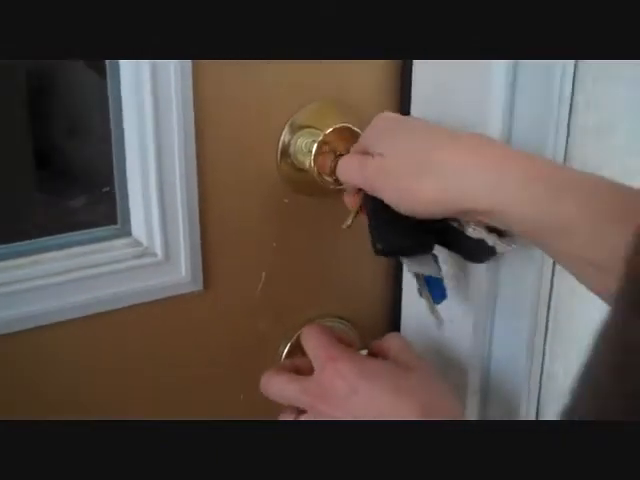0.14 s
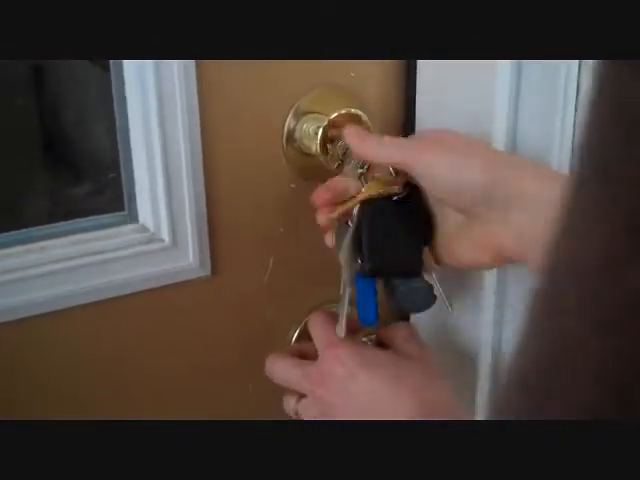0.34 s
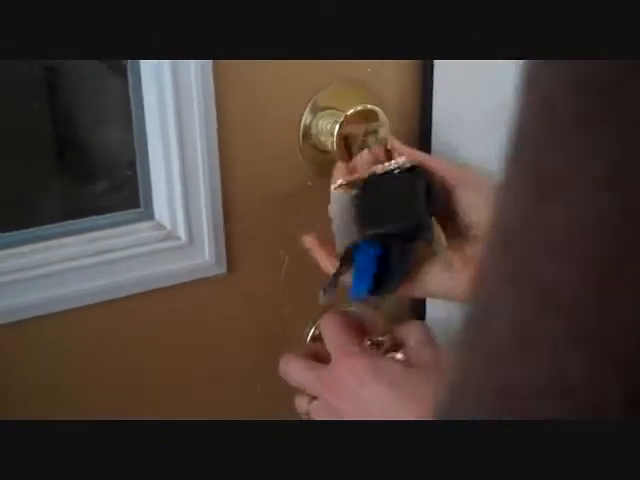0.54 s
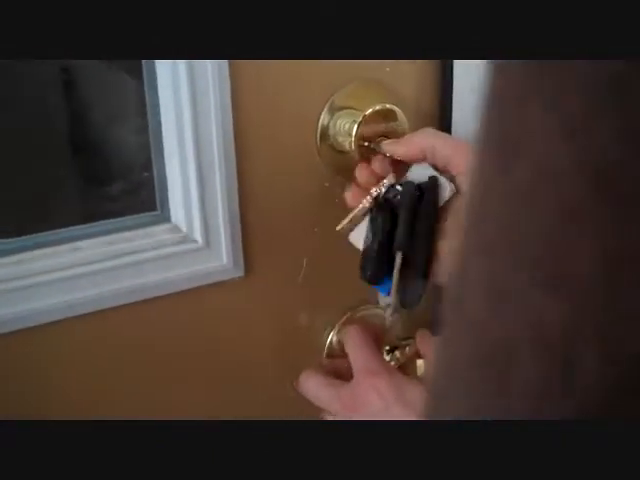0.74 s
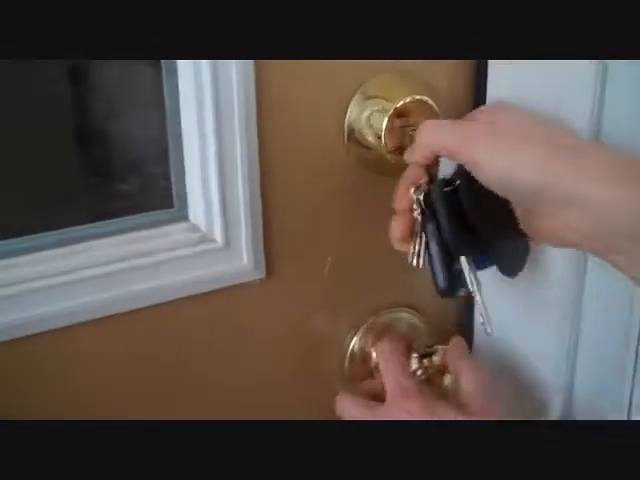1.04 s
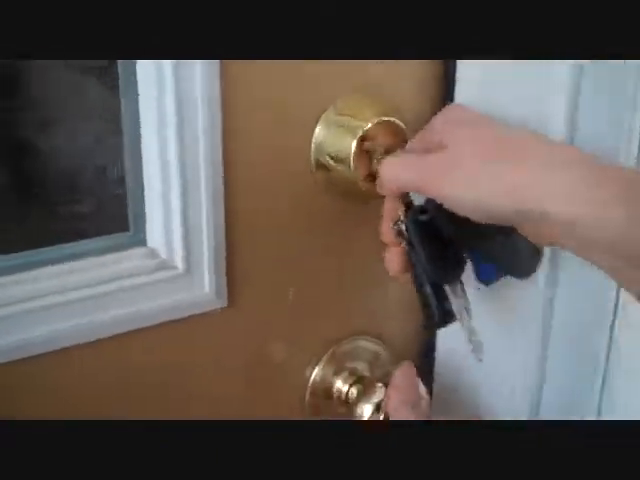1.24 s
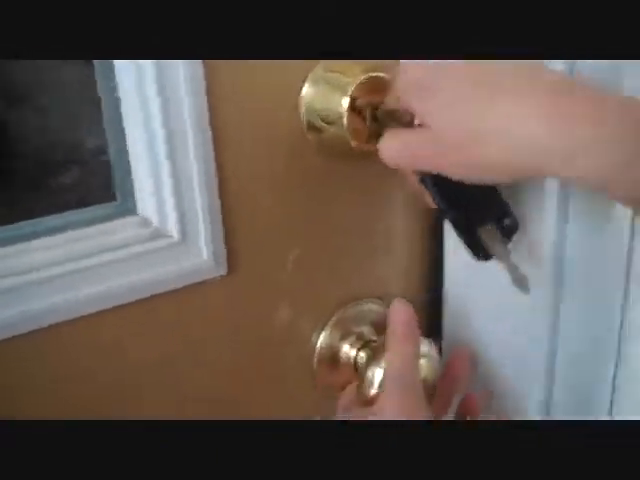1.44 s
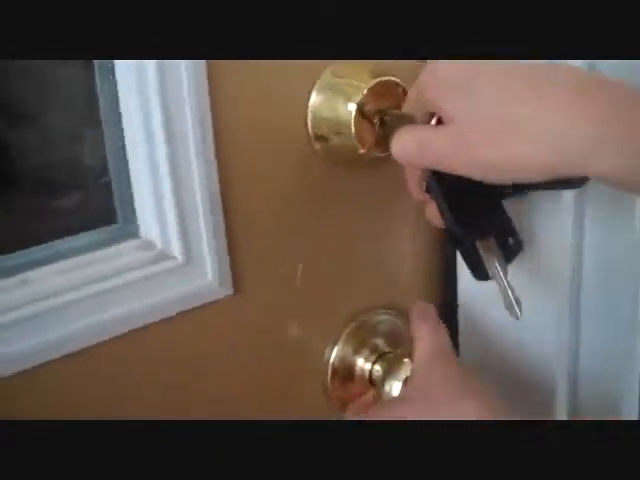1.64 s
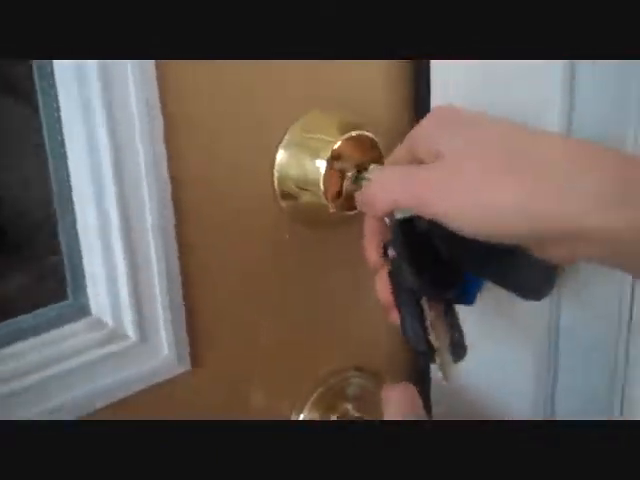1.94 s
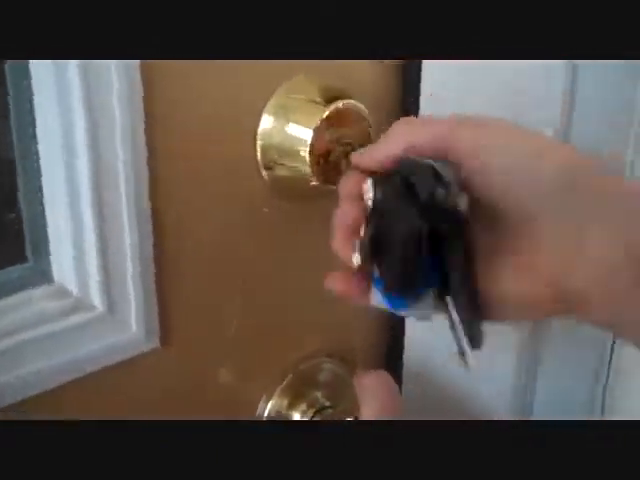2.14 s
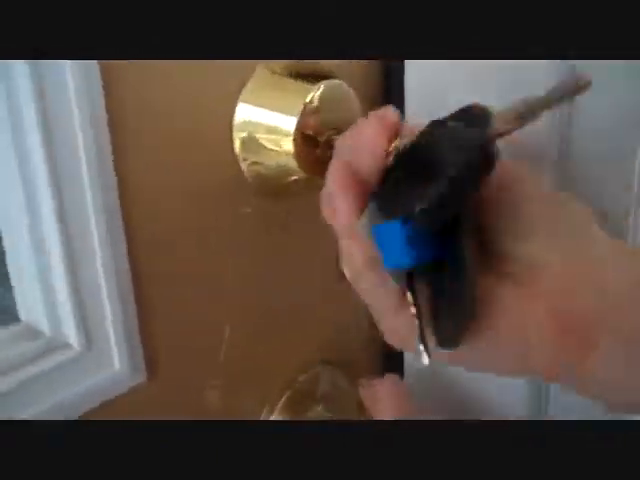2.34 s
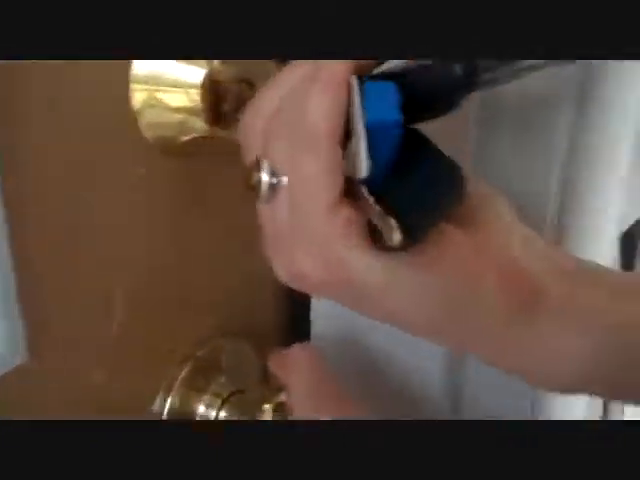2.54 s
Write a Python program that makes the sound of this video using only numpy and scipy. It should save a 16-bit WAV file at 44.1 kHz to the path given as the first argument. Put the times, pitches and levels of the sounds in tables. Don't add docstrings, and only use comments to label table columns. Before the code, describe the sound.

Keys jingle and clack on a ring as a deadbolt turns and snaps in a wooden door

```python
import sys
import numpy as np
from scipy import signal
from scipy.io import wavfile

SR = 44100
rng = np.random.default_rng(int(sys.argv[2]) if len(sys.argv) > 2 else 0)


def bounce(signal):
    frames = np.transpose(np.atleast_2d(signal))
    limited = np.clip(frames, -1, 1)
    pcm = np.round(limited * 32767).astype(np.int16)
    wavfile.write(sys.argv[1], SR, pcm)


def voltage_ratio(level):
    return 10 ** (np.asarray(level, float) / 20)


N = 119070


def in_time(rows):
    seconds, values = np.transpose(rows)
    return np.interp(np.arange(N) / SR, seconds, values)


def at_hz(points, hz):
    table = np.array(points)
    return np.interp(np.log(hz), np.log(table[:, 0]), table[:, 1])


def rms_one(x):
    return x / np.sqrt(np.mean(x ** 2) + 1e-20)


def drift(rate):
    hop = 40
    r = np.exp(-2 * hop * np.pi * rate / SR)
    noise = rng.standard_normal(N // hop + 2002)
    slow = signal.lfilter([1], [1, -2 * r, r * r], noise)[2000:]
    return np.interp(np.arange(N) / hop, np.arange(len(slow)), rms_one(slow))


def peak(x, hz, width_hz):
    r = np.exp(-np.pi * width_hz / SR)
    feedback = [1, -2 * r * np.cos(2 * np.pi * hz / SR), r * r]
    return signal.lfilter([(1 - r * r) / 2, 0, (r * r - 1) / 2], feedback, x + 1e-18)


def ring(x, hz, t60):
    r, w = voltage_ratio(-60 / (t60 * SR)), 2 * np.pi * hz / SR
    return signal.lfilter([0, np.sin(w)], [1, -2 * r * np.cos(w), r * r], x + 1e-18)


def grains(shape, rate, spread_db):
    size = voltage_ratio(spread_db * np.minimum(rng.exponential(1, shape), 4)) * rng.choice([-1, 1], shape)
    return size * (rng.random(shape) < rate / SR)


def banded(white, spectrum, patchy_db, rate):
    # (pitch_hz, likeness 0-1)
    likeness = [(30, 0.1), (100, 0.86), (400, 1), (1200, 0.79), (3000, 0.424), (8000, 0.055)]
    out, together = 0, drift(rate)
    edges = 20 * 2 ** np.arange(0, 9.6, .5)
    for k, (low, high) in enumerate(zip(edges, edges[1:])):
        hz = np.sqrt(low * high)
        if hz < spectrum[0][0] * .8:
            continue
        band = signal.butter(2, [low, high], "band", fs=SR, output="sos")
        mid, side = signal.sosfilt(band, white[k % 2])
        alike = np.clip(at_hz(likeness, hz), 0, 1)
        gain = voltage_ratio(at_hz(spectrum, hz) + patchy_db * (together + .5 * drift(5.9)))
        out = out + gain * (np.sqrt(1 + alike) * mid + np.sqrt(1 - alike) * side * [[1], [-1]])
    return rms_one(out)


def ports(x):
    peak_hz, width_hz, peak_db = (7284, 5990), (754, 920), (10, 8)
    top_hz, trim_db, lag_samples = (14500, 6230), (0.98, 2.35), (2, 0)
    out = []
    for k in range(2):
        lifted = x[k] + voltage_ratio(peak_db[k]) * peak(x[k], peak_hz[k], width_hz[k])
        top = signal.butter(2 + k, min(top_hz[k], .45 * SR), fs=SR, output="sos")
        soft = signal.sosfilt(top, lifted)
        out.append(voltage_ratio(trim_db[k]) * np.roll(soft, lag_samples[k]))
    return np.array(out)


def traffic():
    # (pitch_hz, level_db per Hz)
    street_colour = [(25, -15), (75, -2), (140, -4), (280, -13), (750, -1), (1300, -7), (2200, -14.5),
                     (8000, -30.5)]
    # (time_s, level_db)
    street_level = [(0.0, -40.5), (1.95, -39.5), (2.7, -41.5)]
    wash = banded(rng.standard_normal((2, 2, N)), street_colour, patchy_db=.5, rate=6)
    return voltage_ratio(in_time(street_level) + 1.5) * wash


def hum():
    return voltage_ratio(-49.5) * rms_one(peak(rng.standard_normal(N), hz=79.23, width_hz=3.4))


def rumble():
    # (time_s, level_db)
    rumble_level = [(0, -92), (1.7, -49.5), (2.2, -41), (2.7, -47.5)]
    band = signal.butter(2, [35, 150], "band", fs=SR, output="sos")
    low = signal.sosfilt(band, rng.standard_normal((2, N)))
    sides = low * [[.6], [1.2]] + .3 * low.sum(0)
    return voltage_ratio(in_time(rumble_level) + 2 * drift(8)) * rms_one(sides)


def hand():
    # (time_s, level_db)
    hand_level = [(0, -38), (.2, -42), (.27, -51), (.45, -35), (.59, -40.5), (.7, -41), (1.3, -41),
                  (1.74, -36.5), (1.84, -35.5), (1.9, -27.5), (1.97, -28.5), (2.02, -23.5), (2.13, -36.5),
                  (2.19, -28), (2.29, -28.5), (2.43, -29), (2.53, -35), (2.7, -29.5)]
    # (pitch_hz, level_db per Hz)
    rub_colour = [(700, -23), (1500, -15), (3000, -1), (5000, -1.5), (7000, 1), (10000, -1.5), (15000, -8)]
    # (start_s, length_s, level_db)
    scuffs = [(.194, 0.02, -31.5), (0.22, 0.017, -33.5), (0.289, 0.0065, -32), (0.334, 0.045, -41),
              (0.47, 0.027, -33.5), (0.533, 0.011, -33.5), (0.548, 0.0074, -34.5), (0.645, 0.011, -34.5),
              (0.663, 0.026, -34), (0.743, 0.011, -33.5), (0.858, 0.0192, -31), (0.986, 0.016, -35),
              (1.413, 0.012, -33), (1.429, 0.016, -29), (1.545, 0.0169, -28), (1.563, 0.0042, -21),
              (1.7, .014, -36.5), (1.814, 0.0074, -27.5), (2.179, 0.012, -37.5), (2.274, .02, -31),
              (2.345, 0.034, -33.5), (2.415, 0.037, -35)]
    rise_s, fall_s = .002, .004
    t = np.arange(N) / SR
    drag = np.zeros(N)
    for start, length, db in scuffs:
        rise = np.clip((t - start) / rise_s, 0, 1)
        fall = np.exp(-np.maximum(t - start - length, 0) / fall_s)
        drag += voltage_ratio(db) * rise * fall
    rub = banded(grains((2, 2, N), 4000, 3.5), rub_colour, patchy_db=1.04, rate=30)
    both, apart = grains((2, N), 5000, 2.5)
    band = signal.butter(1, [2260, 11000], "band", fs=SR, output="sos")
    crackle = rms_one(signal.sosfilt(band, both + .5 * apart * [[1], [-1]]))
    return voltage_ratio(-3.5) * (voltage_ratio(in_time(hand_level)) * rub + drag * (0.17 * rub + 1.53 * crackle))


def porch(x):
    t = np.arange(6000) / SR
    fade = voltage_ratio(-60 * t / .035) * (t > .002)
    tail = rng.standard_normal((2, len(t))) * fade
    tail /= np.sqrt((tail ** 2).sum(1, keepdims=True))
    return signal.fftconvolve(x[None], tail, axes=1)[:, :N]


def door():
    # (time_s, peak_db, strongest pitch_hz)
    knocks = [(0.195, -21, 542), (0.223, -30, 1900), (0.293, -27.5, 1700), (.668, -28.5, 1510),
              (1.178, -24, 1860), (1.3245, -25, 1600), (1.555, -20.5, 630), (1.5636, -11, 560),
              (1.569, -12, 2400), (1.5977, -26, 1560), (1.998, -25.5, 2500)]
    # (pitch_hz, level_db, t60_s)
    door_tones = [(250, -22, 0.019), (464, -16, 0.22), (585, -3.5, 0.083), (670, -3, 0.07),
                  (920, 1.5, 0.016), (1258.4, 5, 0.04), (1465, 8, 0.0195), (1970, 3, 0.026),
                  (2370, -0.5, 0.014), (3680, 8.5, 0.008)]
    length = 900
    fade = voltage_ratio(-60 * np.arange(length) / SR / .03)
    shudders = rng.standard_normal((len(knocks), length)) * fade
    spread_db = rng.normal(0, 2, (len(knocks), len(door_tones)))
    out = np.zeros(N)
    for (hz, level_db, t60), chances in zip(door_tones, spread_db.T):
        clicks = np.zeros(N)
        for (s, db, pitch), shudder, chance in zip(knocks, shudders, chances):
            far_db = 6.9 * abs(np.log2(hz / pitch))
            i = int(s * SR)
            clicks[i:i + length] += voltage_ratio(db + level_db - 26.0 + chance - far_db) * shudder
        out += ring(clicks, hz, t60)
    return signal.sosfilt(signal.butter(1, 160, "high", fs=SR, output="sos"), out)


def sings():
    # (centre_s, half_length_s, peak_db, pitch_hz)
    swells = [(0.2525, 0.0022, -16, 7150), (.3455, .001, -16, 5700), (0.365, 0.004, -26, 6900),
              (.5472, 0.0023, 2, 5510), (.547, .0023, -1, 7050), (.558, .007, -22, 5520),
              (.634, .003, -23, 6000), (.7562, 0.0025, -15, 7310), (0.8665, 0.002, -9, 7300),
              (.8715, .0013, -14, 7300), (0.877, 0.002, -11, 7350), (.892, .006, -28, 5550),
              (1.446, .004, -12, 7100), (1.5645, .0012, -2, 6030), (2.359, 0.004, -15, 6500)]
    t, out = np.arange(N) / SR, np.zeros((2, N))
    noise = rng.standard_normal((2, N))
    for s, half, db, hz in swells:
        part = slice(int((s - .03) * SR), int((s + .05) * SR))
        rough = rms_one(peak(noise[0, part] + .5 * noise[:, part], hz, 330))
        swell = np.exp(-np.abs((t[part] - s) / half) ** 3)
        tone = (np.sin(2 * np.pi * hz * t[part]) + .4 * rough) * swell
        out[:, part] += voltage_ratio(db - 2) * tone / np.abs(ports(tone).mean(0)).max()
    return out


def collisions(rows):
    # (pitch_hz, level_db, t60_s)
    key_tones = [(4400, -17, 0.043), (5520, -1, 0.16), (6300, -19, 0.014), (6700, 3, 0.033),
                 (7500, -10, 0.068), (7200, -43, 0.03), (9060, 4, .05)]
    body_hz = 1350
    size = 4096
    out, t = np.zeros((2, N + size)), np.arange(size) / SR
    rattles = grains((len(rows), 2, size), 5000, 2.5)
    chances = rng.standard_normal((len(rows), len(key_tones)))
    for (s, db, hz, t60), rattle, chance in zip(rows, rattles, chances):
        chatter = rattle[0] + .5 * rattle[1] * [[1], [-1]]
        hit = .5 * chatter * voltage_ratio(-60 * t / max(t60, .002))
        hit[:, 0] = 1.1
        rings = 0
        for (f, level_db, fade_s), a in zip(key_tones, chance):
            near_db = level_db + 4.0 * a - 14 * abs(np.log2(f / hz))
            rings = rings + voltage_ratio(-22.5 + near_db) * ring(hit, f, min(fade_s, .12))
        body = peak(peak(hit, hz, body_hz), hz, 2 * body_hz)
        crack = voltage_ratio(-11) * peak(hit, 4500, 9900)
        clack = body + crack + 0.063 * rings
        i = int(s * SR)
        out[:, i:i + size] += voltage_ratio(db) * clack / np.abs(ports(clack[:, :600]).mean(0)).max()
    return out[:, :N]


def key_ticks():
    # (time_s, peak_db, pitch_hz)
    touches = [(0.196, -24, 5800), (0.198, -21, 6460), (0.209, -18, 11000), (0.2253, -12, 8440),
               (0.2259, -14, 5500), (0.244, -23, 5000), (.283, -34, 7200), (.3415, -21.5, 6040),
               (0.4103, -12.5, 10000), (.446, -25, 7000), (.463, -30, 6500), (0.4754, -13, 11700),
               (0.4856, -13, 7440), (0.489, -11.5, 7000), (0.498, -22, 6000), (.506, -21.5, 7000),
               (.513, -19, 5500), (0.536, -13, 5000), (.5525, -17, 6200), (0.6122, -19, 12500),
               (.652, -19, 3000), (0.6562, -22, 7200), (.689, -17, 13200), (.958, -24, 5000),
               (1.326, -31, 13000), (0.694, -23, 5500), (.703, -33, 6500), (0.7123, -26, 7500),
               (0.727, -18.5, 5970), (0.7483, -22, 7300), (0.809, -30, 7500), (0.812, -27, 7300),
               (.855, -25, 7300), (0.865, -4, 6200), (.872, -26, 3670), (1.368, -26.5, 5830),
               (1.406, -24, 4000), (1.429, -5, 4000), (1.4385, -9, 4400), (1.478, -14.5, 6300),
               (1.554, -17.5, 6000), (1.561, -6, 3500), (1.5703, -1, 3600), (1.633, -30, 7360),
               (1.823, -16, 10400), (1.8578, -22, 7430), (1.8865, -18, 7100), (2.035, -14, 7300),
               (2.176, -19, 8550), (2.192, -18.5, 8200), (2.2215, -19.5, 7500), (2.358, -15.5, 3000),
               (2.45, -17.5, 7500), (2.508, -20.5, 8500), (2.561, -26, 9400), (2.6, -18, 7500),
               (2.621, -26, 9000), (2.644, -26, 8000), (2.673, -24, 7000)]
    t60_s = .006
    return collisions([(*row, t60_s) for row in touches])


def key_turns():
    # (time_s, peak_db, pitch_hz, rattle t60_s)
    lock_hits = [(1.0838, -22, 6500, .008), (1.1045, -25, 3700, .01), (1.167, -25, 6500, .015),
                 (1.179, -25, 2200, .02), (1.3248, -12, 5700, .008), (1.3826, -21, 6500, .015),
                 (1.4143, -6, 5700, .008), (1.4155, -6, 7400, .008), (1.4293, -3, 6900, .016),
                 (1.4738, -7, 5900, .008), (1.4742, -12, 4300, .008), (1.508, -14, 4250, .01),
                 (1.5302, -14, 4400, .014), (1.5448, -19, 4400, .012), (1.5637, 2, 5800, .009),
                 (1.6008, -17, 4900, .014), (1.7482, -11, 6000, .012), (1.816, -17, 7400, .012),
                 (1.998, -9, 5200, .01), (2.3415, -11, 5300, .006), (2.353, -13, 6300, .01),
                 (2.3725, -14, 6460, .014), (2.42, -17, 7500, .01), (2.5142, -18, 7900, .012)]
    return collisions(lock_hits)


def bunch_clacks():
    # (time_s, peak_db, pitch_hz, rattle t60_s)
    clacks = [(.1648, -25, 7200, .012), (.2232, -9, 7200, .006), (.2932, -16, 5600, .02),
              (.3062, -15, 5600, .006), (.3448, -22, 5700, .006), (.4098, -17, 6700, .008),
              (.4725, -16, 7000, .02), (.487, -16, 7600, .006), (.517, -20, 7500, .008),
              (.5271, -10, 4900, .01), (.5318, -13, 6900, .03), (.5449, 2, 6200, .012),
              (.611, -14, 7700, .008), (.6248, -9, 6500, .008), (.633, -18, 6900, .008),
              (.6682, -5, 6900, .012), (.7212, -21, 6000, .006), (.82, -20, 7500, .008),
              (.851, -20, 7400, .02), (.8605, -13, 7300, .012), (.871, -18, 6000, .008),
              (.988, -17, 7300, .02)]
    return collisions(clacks)


def scene():
    behind = traffic() + hum() + rumble()
    near = door() + sings() + key_ticks() + key_turns() + bunch_clacks()
    return behind + hand() + voltage_ratio(-9) * porch(near.mean(0)) + near


def band_limit(x):
    return signal.sosfilt(signal.butter(12, 15510, fs=SR, output="sos"), x)


def record(dry):
    top_cut = signal.ellip(10, .3, 32, 14180, fs=SR, output="sos")
    heard = signal.sosfilt(top_cut, ports(dry))
    mix = np.clip(heard, -0.97, 0.97)
    return band_limit(mix)


dry = scene()
out = record(dry)
bounce(out)
```